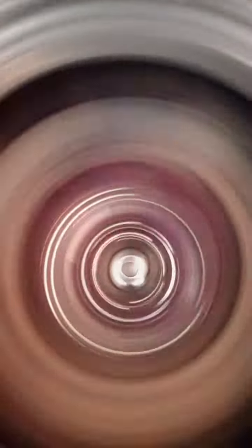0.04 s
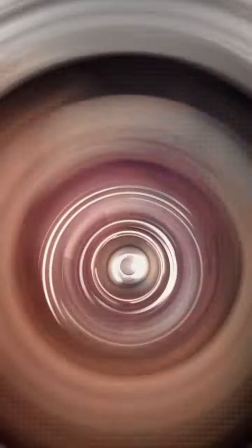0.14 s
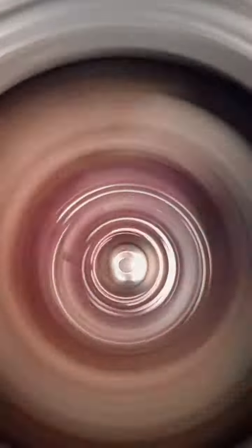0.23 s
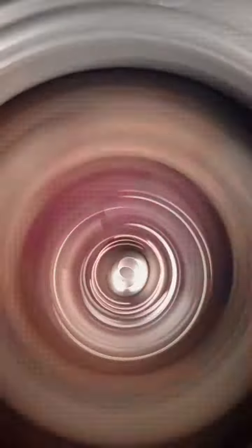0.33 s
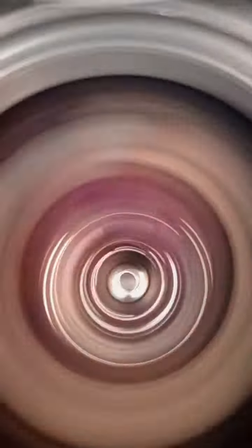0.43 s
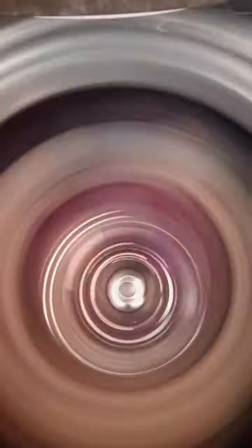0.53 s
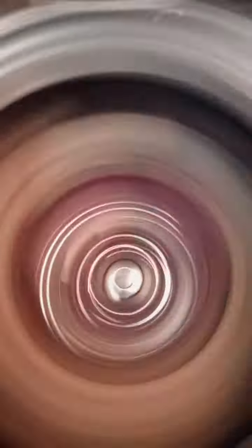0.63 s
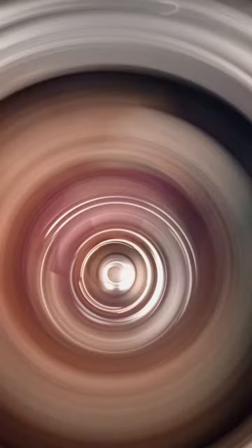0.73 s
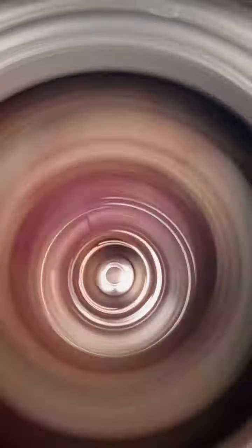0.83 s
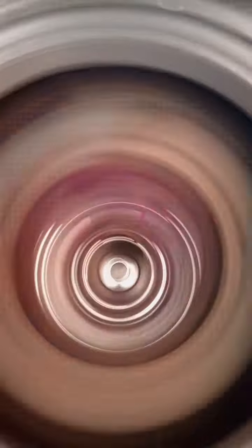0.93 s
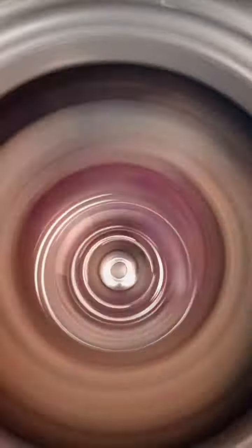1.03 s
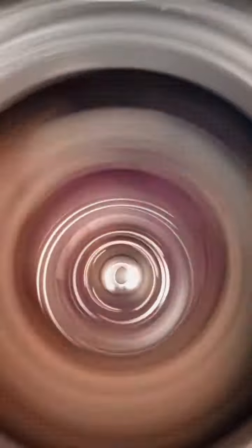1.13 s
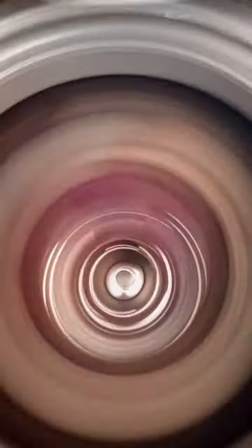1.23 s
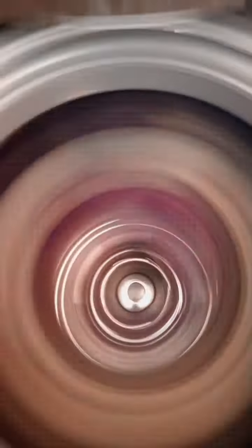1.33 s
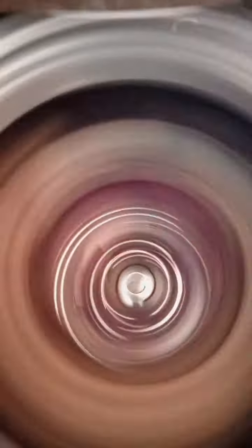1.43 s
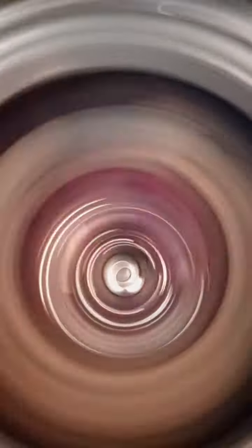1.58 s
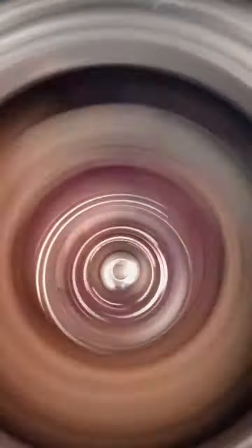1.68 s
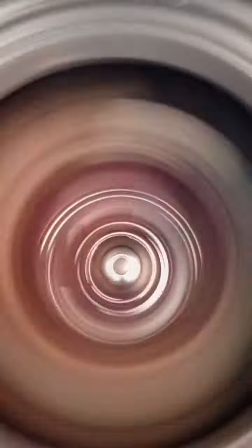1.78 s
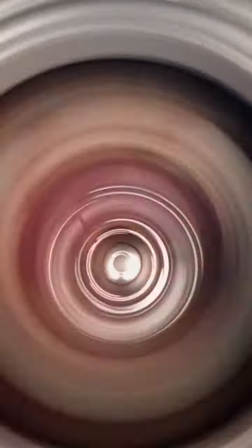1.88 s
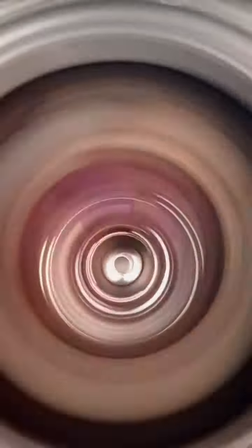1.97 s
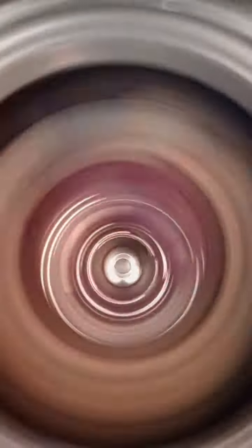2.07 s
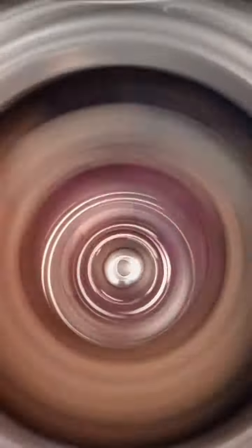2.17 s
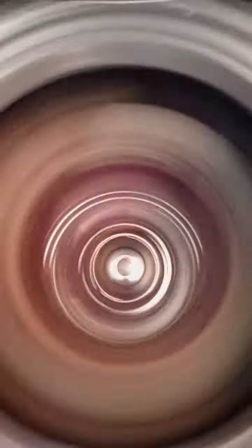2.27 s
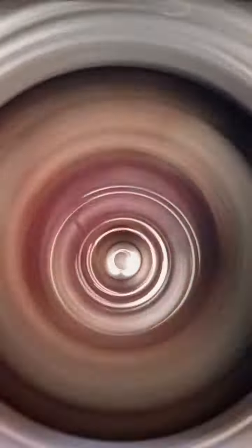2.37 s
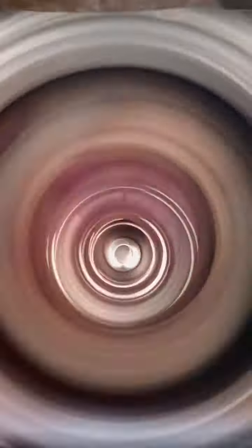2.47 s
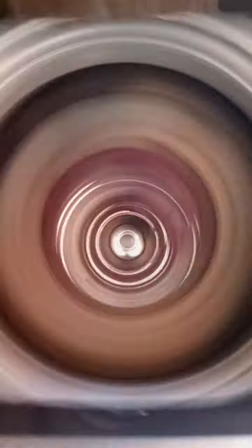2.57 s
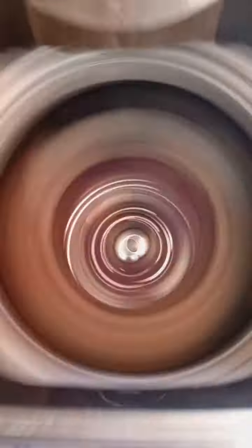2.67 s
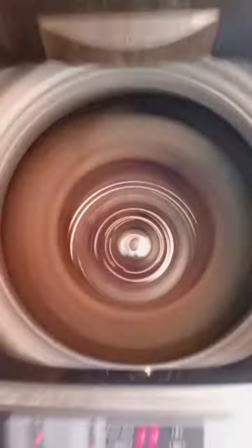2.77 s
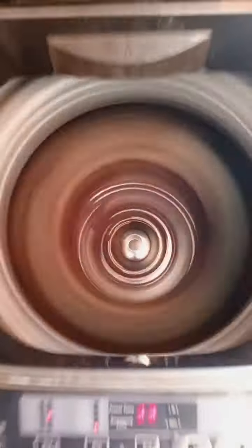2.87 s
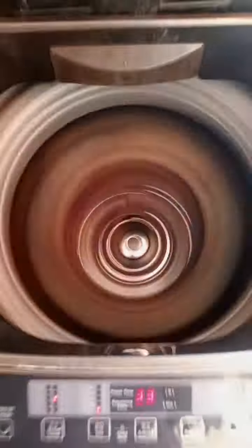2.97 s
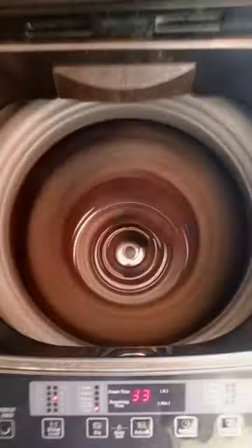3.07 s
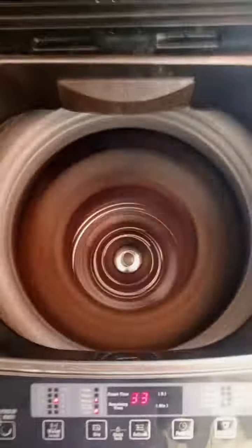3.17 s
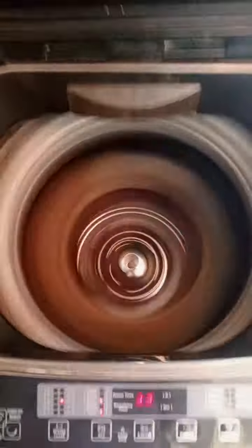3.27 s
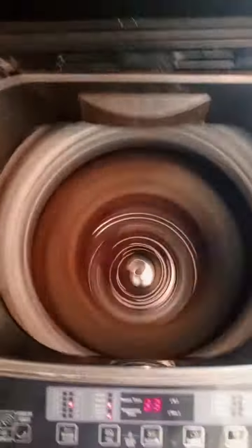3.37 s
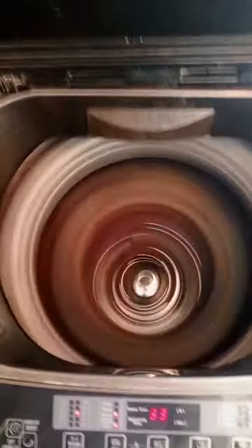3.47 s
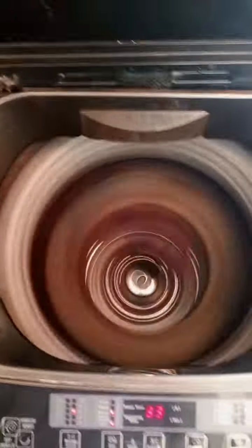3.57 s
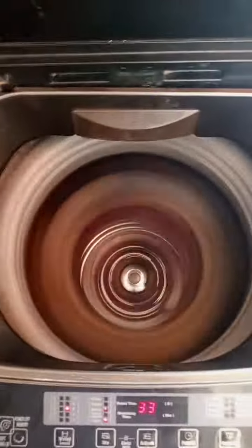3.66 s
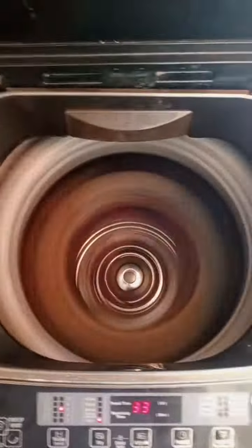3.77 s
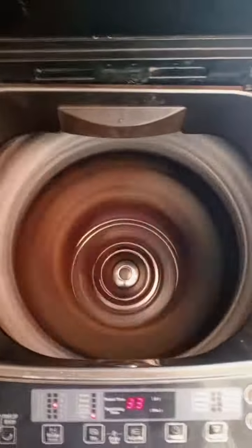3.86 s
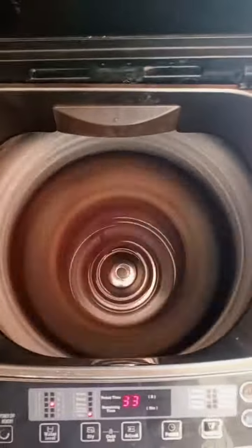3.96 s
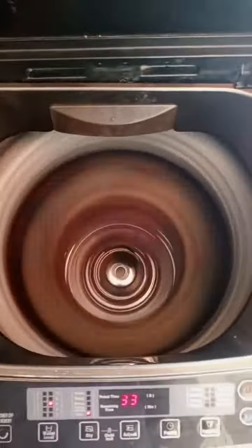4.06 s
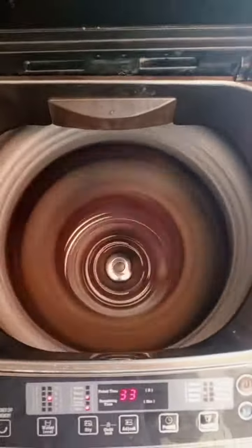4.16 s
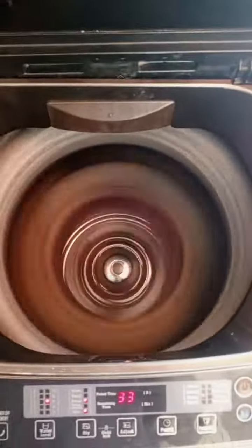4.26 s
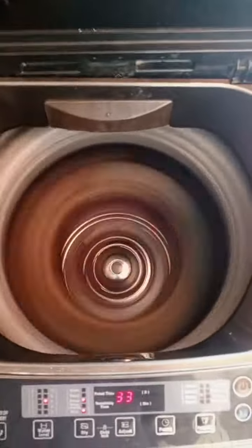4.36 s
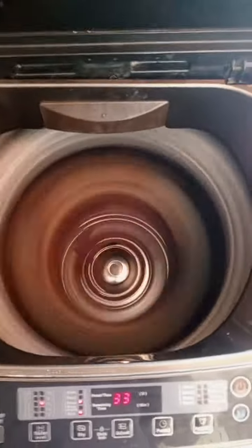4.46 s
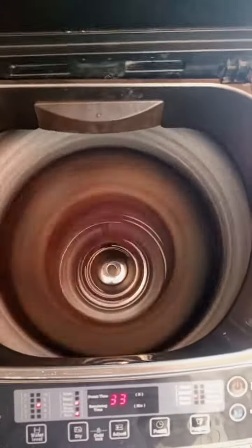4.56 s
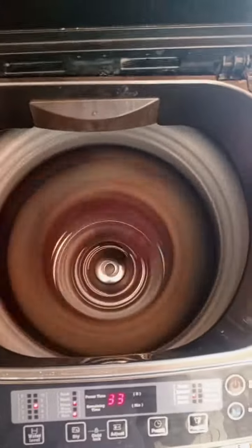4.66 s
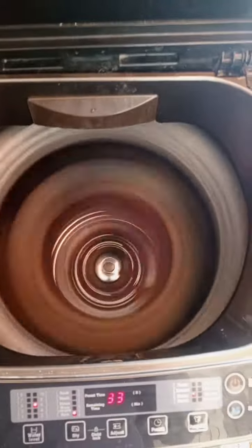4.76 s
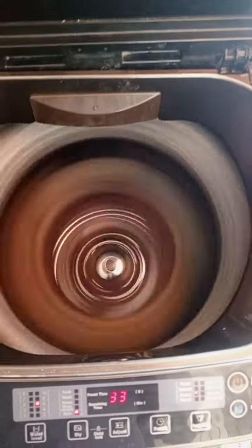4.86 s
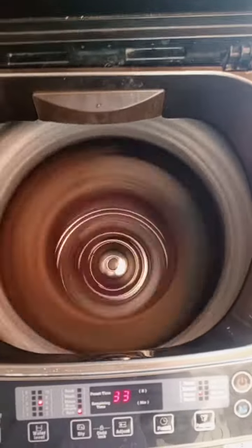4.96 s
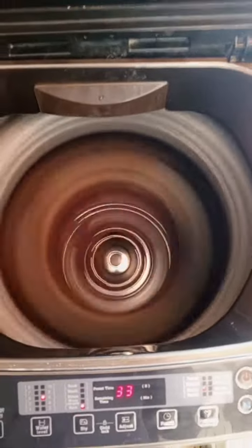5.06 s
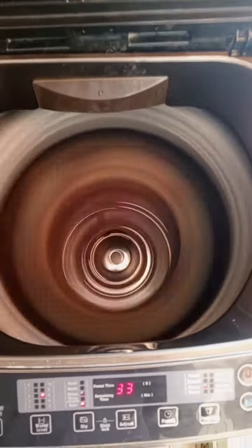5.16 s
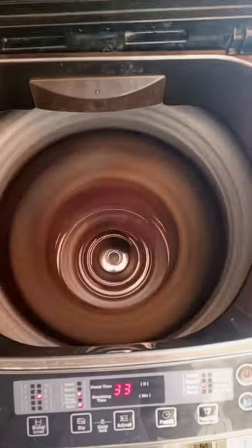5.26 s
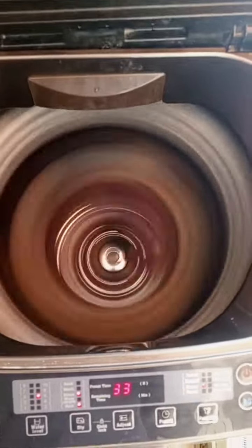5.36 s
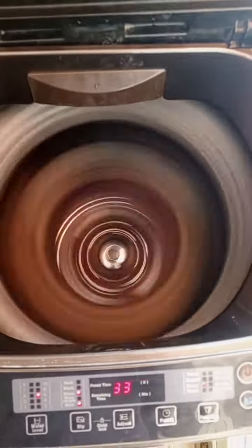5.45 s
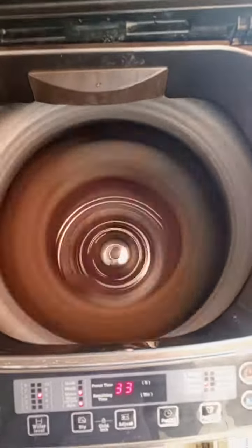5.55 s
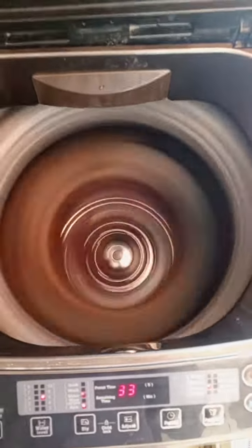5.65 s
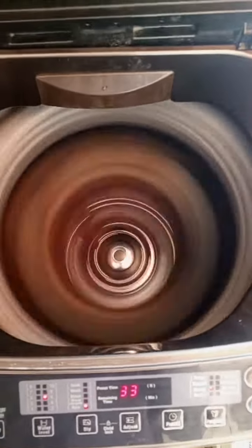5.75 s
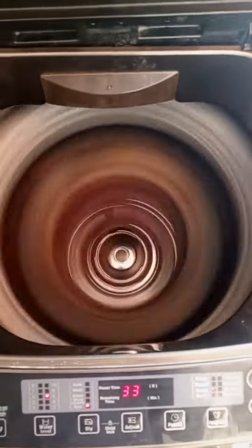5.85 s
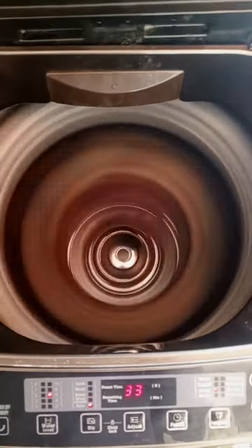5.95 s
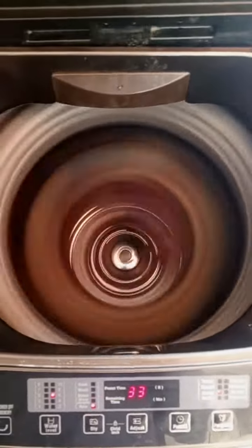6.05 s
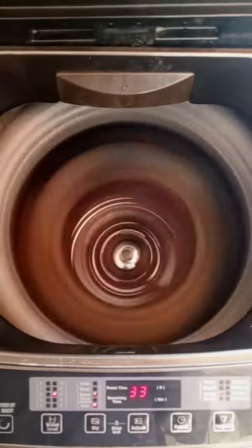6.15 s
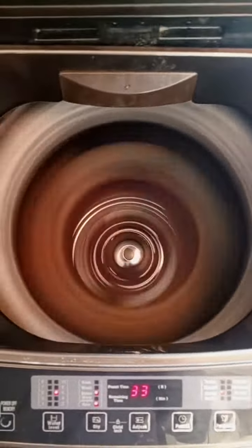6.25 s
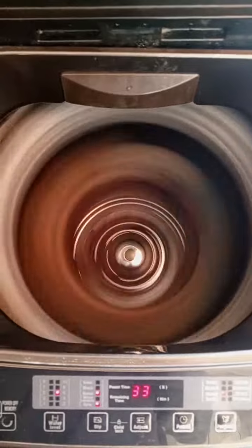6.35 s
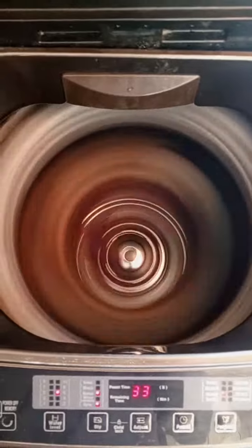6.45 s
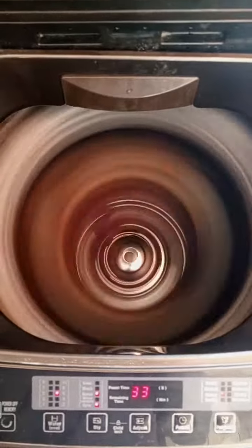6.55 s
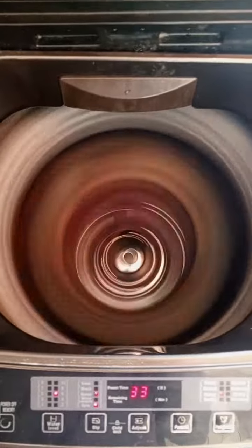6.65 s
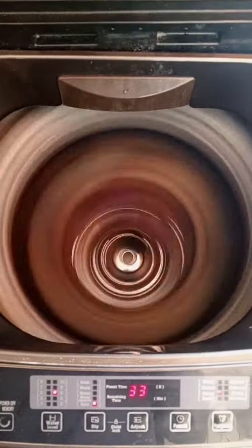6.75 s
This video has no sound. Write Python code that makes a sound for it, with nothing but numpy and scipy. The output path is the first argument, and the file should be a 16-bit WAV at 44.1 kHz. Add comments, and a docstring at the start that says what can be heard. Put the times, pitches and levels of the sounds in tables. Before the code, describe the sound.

A washing machine spins fast with a rapid, even knocking rattle over a low hum and rushing air, easing slightly later.

```python
"""Washing machine on spin, lid open.

A top-loader turns about twelve times a second. Once a turn the off-centre drum knocks the swaying
tub and the cabinet, then rubs on the way back. Flung drops tick, air hisses, drum and motor hum.
The microphone draws back from the drum; then the motor cuts out and the drum begins to coast."""
import sys
import numpy as np
from scipy import signal
from scipy.fft import rfft, irfft
from scipy.io import wavfile
from scipy.ndimage import uniform_filter1d

SR = 44100
rng = np.random.default_rng(int(sys.argv[2]) if len(sys.argv) > 2 else 0)


def to_wav(s):
    """Save 16-bit WAV."""
    ch = np.atleast_2d(s).T  # columns
    pcm = np.round(np.clip(ch, -1, 1) * 32767)  # PCM
    wavfile.write(sys.argv[1], SR, pcm.astype(np.int16))


N = 300311
TURNS_PER_S, FIRST_KNOCK_S, MOTOR_OFF_S = 11.939, .0617, 3.67
CONTACT_S, ATTACK_SAMPLES = .0002, 650
# near level/dB, far level/dB, loss at motor cut/dB, loss with slowing/(dB per turn/s)
CRACK_LAW = (-23, -27.5, 1.52, 3)
THUMP_LAW = (-20.5, -23, 2, 1)
AIR_LAW = (-31.5, -36.5, 0.2, 1.9)


def knocks(cabinet_db=-3, clatter_db=-3.5, boom_db=-0.12, echo_s=.028, size=14000):
    """The drum hits the same spot each turn, so tub and cabinet ring almost alike each time."""
    t, out = np.arange(size) / SR, np.zeros(N)
    tub, cabinet, click = tub_ring(t), cabinet_ring(t), contact_click(t)
    shared_grain = clatter_grain(size)
    for s, crack_db, thump_db in blows():
        metal = amp(cabinet_db) * heard(*cabinet, s) + amp(clatter_db) * clatter(shared_grain, s, t)
        crack = amp(crack_db) * (metal + heard(1, 0.24, s) * click)
        boom = amp(thump_db + boom_db) * heard(*tub, s)
        add(out, s, crack + boom)
        add(out, s + echo_s, amp(heard(-11, -7, s)) * boom)
    return out


def blows(spread_db=0.5):
    """Knock strength varies with sway and chance. Rows: t/s, crack/dB, thump/dB."""
    s, lean = turns().T
    chance_db = spread_db * rng.standard_normal((len(s), 2))
    crack_db = loudness(CRACK_LAW, s) + heard(0.83, 1.5, s) * lean + chance_db[:, 0]
    thump_db = loudness(THUMP_LAW, s) + 1.2 * lean + chance_db[:, 1]
    return np.column_stack([s, crack_db, thump_db])


# f/Hz, t60/s, near level/dB, far level/dB
TUB_MODES = [(60.3, 0.6, -14, -21), (100, 0.31, -2.5, -10), (145, 0.39, -33, -10.5), (192.2, .1, 9, 3.5),
             (241, 0.052, 11.5, 10.5), (275.4, 0.23, -0.5, -1), (324.8, 0.18, -4.5, -13),
             (399, 0.097, -4, -5)]
def tub_ring(t):
    """Low tub modes, near and far. Neighbours swing in opposition, so the boom swells."""
    hz, t60_s, *levels_db = np.transpose(TUB_MODES)
    opposed = np.pi * (1 + np.arange(len(hz)))
    return [ring(hz, t60_s, db, opposed, 1 / SR, t) for db in levels_db]


# f/Hz, near level/dB, far level/dB
CABINET_MODES = [(505, -2, -2), (565, -5, -9), (635, -1.5, -3.5), (712, -5.5, 1), (780, -4.5, -5),
                 (855, -7.5, -4), (1062, -5.5, -12.5), (1228, -7, -13.5), (1360, -9.8, -7),
                 (1440, -12.4, -9), (1590, -7, -10.8), (1665, -8.4, -13), (1805, -10.4, -13),
                 (1890, -14, -7.3), (1968, -9, -10), (2340, -10, -9.5), (2402, -7.5, -11),
                 (2600, -12.7, -16), (2930, -13, -13), (3240, -10, -15), (3520, -17, -12), (3880, -10, -15)]
# f/Hz, t60/s
CABINET_DECAY = [(500, 0.089), (1500, 0.092), (4000, 0.061)]
def cabinet_ring(t, rise_cycles=3.8):
    """Sheet-metal panels, near and far. They take up the blow over a few cycles, out of step."""
    hz, *levels_db = np.transpose(CABINET_MODES)
    t60_s = read(CABINET_DECAY, hz)
    phase = rng.uniform(0, 2 * np.pi, len(hz))
    return [unit(ring(hz, t60_s, db, phase, rise_cycles / hz, t), ATTACK_SAMPLES) for db in levels_db]


# f/Hz, near level/dB, far level/dB
CLATTER_SPECTRUM = [(100, -14, -6), (350, 3, 10.5), (500, 14, 8.5), (694, 11.5, 6.5), (840, 6.5, 7.5),
                    (920, 10, 3), (1220, 4, 1.5), (2000, 5.5, 4), (4020, 1.5, 0), (5520, -6, -8),
                    (6440, -2.5, -5.5), (10100, -9.5, -13.5), (12900, -21.5, -35), (16000, -44, -46)]
def clatter(shared_grain, s, t, snap_db=1, snap_s=0.018):
    """Clatter, densest just after contact. From farther back it varies more from knock to knock."""
    fresh = heard(0.23, 0.86, s)
    grain = np.sqrt(1 - fresh ** 2) * shared_grain + fresh * clatter_grain(len(t))
    near, far = (colour(grain, CLATTER_SPECTRUM, column) for column in (1, 2))
    snap = (1 + amp(snap_db) * np.exp(-t / snap_s)) * (1 - np.exp(-t / CONTACT_S))
    return unit(heard(near, far, s) * snap * (1 - t / t[-1]), ATTACK_SAMPLES)


# f/Hz, t60/s
CLATTER_DECAY = [(200, 0.64), (1000, 0.098), (4000, 0.086), (12000, 0.037)]
def clatter_grain(size):
    """A dense ring with its chance spectral peaks flattened."""
    spectrum = rfft(dying_noise(CLATTER_DECAY, size))
    power = uniform_filter1d(abs(spectrum) ** 2, size=60)
    return unit(irfft(spectrum / np.sqrt(power + 1e-12), size))


def contact_click(t, level_db=12, peak_s=.00005, top_hz=7200):
    """The contact itself: one sharp pulse."""
    pulse = -amp(level_db) * t / peak_s * np.exp(1 - t / peak_s)
    return signal.sosfilt(signal.butter(4, top_hz, fs=SR, output="sos"), pulse)


# near delay after knock/s, near level re crack/dB, far delay/s, far level/dB
RUB_STROKES = [(0.0506, -9, .047, -6.5), (.072, -18, .073, -19)]
# f/Hz, width/Hz, near lift/dB, far lift/dB
RUB_RESONANCES = [(1890, 70, -1, -2), (2680, 110, -2, -12), (2900, 140, 12, 8), (3520, 170, 1, 7),
                  (3950, 83, 6, -5), (4150, 90, 7, -7), (4420, 72, 1, 10)]
# f/Hz, level/dB
RUB_SPECTRUM = [(100, -30), (400, -31), (1200, -12), (1650, 13.5), (2200, 4.5), (2900, -1), (3250, 1),
                (3550, 6), (4300, 2), (5200, -9.5), (8500, -5.5), (14000, -41)]
def rubs(rise_s=0.0021, fade_s=0.009, spread_db=0.4, size=3000):
    """Two short scrapes as the tub swings back, both exciting the same resonances."""
    t, hz, out = np.arange(size) / SR, np.fft.rfftfreq(size, 1 / SR), np.zeros(N)
    stroke = (1 - np.exp(-t / rise_s)) * np.exp(-t / fade_s)
    for s, _ in turns():
        lift_db = sum(heard(near_db, far_db, s) / (1 + (2 * (hz - centre_hz) / width_hz) ** 2)
                      for centre_hz, width_hz, near_db, far_db in RUB_RESONANCES)
        for near_s, near_db, far_s, far_db in RUB_STROKES:
            grain = irfft(rfft(rng.standard_normal(size)) * amp(lift_db), size)
            scrape = unit(colour(grain, RUB_SPECTRUM)) * stroke / stroke.max()
            level_db = loudness(CRACK_LAW, s) + heard(near_db, far_db, s) - rng.normal(0, spread_db)
            add(out, s + heard(near_s, far_s, s), amp(level_db) * scrape)
    return out


# t/s, level/dB, treble/dB
LARGE_DROPS = [(0.558, -28, 0), (0.705, -18.5, -2), (1.0608, -26, 0), (1.5284, -27, 0), (1.56, -17, -2),
               (1.6268, -15, 0), (1.7797, -20.5, -6), (2.2, -22.5, 3), (2.214, -22, -8), (2.5484, -26, 0),
               (2.956, -27, -5), (2.97, -28, 0), (3.458, -27.5, 2), (4.0476, -24, -3), (5.2816, -31, -12),
               (5.351, -22, -10), (6.6972, -30, -1)]
# f/Hz, level/dB
DROP_SPECTRUM = [(1000, -32), (2200, 0), (2900, 0.5), (4200, -0.5), (6500, -3.5), (9000, -2.5), (11000, -6),
                 (12500, -19), (16000, -32)]
def drops(gain_db=-5, spray_db=-44, spread_db=4, decay_s=0.0025, tail_db=-14, tail_s=0.016, size=1800):
    """Water flung from the load ticks on the outer tub: a few large drops and a fine spray."""
    t, out = np.arange(size) / SR, np.zeros(N)
    shape = (np.exp(-t / decay_s) + amp(tail_db) * np.exp(-t / tail_s)) * (1 - np.exp(-t / CONTACT_S))
    spray = [(rng.uniform(0, N / SR), rng.normal(spray_db, spread_db), 0) for _ in range(130)]
    for s, db, treble_db in spray + list(LARGE_DROPS):
        tick = colour(rng.standard_normal(size), DROP_SPECTRUM)
        tick = colour(tick, [(4500, 0), (6500, treble_db)])
        add(out, s, amp(db + gain_db) * unit(tick) * shape)
    return out


# multiple of turning rate, level/dB
DRUM_HARMONICS = [(11, -11), (13, -11.5), (15, -18.5), (16, -15.5)]
def drum_hum(far_db=-7, lead_s=0.0051):
    """The lopsided drum flexes the tub; the hum swells twice a turn, once just before the knock."""
    t = np.arange(N) / SR
    angle = 2 * np.pi * (drum_turns() + lead_s * TURNS_PER_S)
    hum = sum(amp(db) * np.cos(order * angle) for order, db in DRUM_HARMONICS)
    return np.sqrt(2) * hum * amp(loudness(THUMP_LAW, t) + heard(0, far_db, t))


def motor_hum(hum_hz=99.2, drift_hz=0.21, load_swing=0.59, near_db=-26, far_db=-34.5):
    """The motor hums until switched off; its load swings once a drum turn."""
    t = np.arange(N) / SR
    hz = hum_hz + drift_hz * unit(uniform_filter1d(rng.standard_normal(N), size=20000))
    load = 1 + load_swing * np.sin(2 * np.pi * drum_turns())
    hum = np.sin(2 * np.pi * np.cumsum(hz) / SR)
    return amp(heard(near_db, far_db, t)) * driven(t) * load * hum


# f/Hz, near level/dB, far level/dB
AIR_SPECTRUM = [(20, -3, -9), (44.4, -3, 10), (88, 24, 19.5), (254, 19.5, 23.5), (487, 13.5, 13.5),
                (1020, 3, 5.5), (1610, -2, 5.5), (2920, -1.5, -3.5), (4500, -7, -1.5), (5900, -9.5, -12.5),
                (8650, -9.5, -9.5), (9700, -14, -16.5), (13300, -23, -23), (16000, -26, -30)]
def air_rush(flutter_db=2):
    """Air dragged round by the drum, fluttering with turbulence."""
    t, noise = np.arange(N) / SR, rng.standard_normal(N)
    near, far = (colour(noise, AIR_SPECTRUM, column) for column in (1, 2))
    flutter = unit(uniform_filter1d(rng.standard_normal(N), size=700))
    return heard(near, far, t) * amp(loudness(AIR_LAW, t) + flutter_db * flutter)


# t/s, f/Hz
HISS_CENTRE = [(0, 9300), (.5, 10070), (1.3, 10040), (2.2, 9770), (2.7, 8900), (3.1, 7730), (3.6, 8670),
               (4.3, 7750), (5.3, 8350), (6.8, 8100)]
def air_hiss(gain_db=-19, half_width_hz=750):
    """A broad peak in the rush of air that slides as the microphone moves."""
    t = np.arange(N) / SR
    noise = [1, 1j] @ rng.standard_normal((2, N))
    band = signal.sosfilt(signal.butter(2, half_width_hz, fs=SR, output="sos"), noise)
    carrier = np.exp(2j * np.pi * np.cumsum(curve(HISS_CENTRE, t)) / SR)
    return amp(loudness(AIR_LAW, t) + gain_db) * unit((band * carrier).real)


# f/Hz, t60/s
ROOM_DECAY = [(100, 0.27), (1000, 0.32), (10000, 0.23)]
def room(x, near_db=-17, far_db=-12, bass_db=-8, rise_s=0.0034, size=16000):
    """A small hard room, heard more from farther back."""
    tail = dying_noise(ROOM_DECAY, size) * np.clip(np.arange(size) / SR / rise_s, 0, 1)
    wet = signal.fftconvolve(x, tail / np.linalg.norm(tail))
    wet = colour(wet, [(250, bass_db), (500, 0)])[:N]
    return x + amp(heard(near_db, far_db, np.arange(N) / SR)) * wet


def turns(sways_per_turn=.308, peak_turn=1.82, early_s=.00045):
    """The tub sways on its springs; leaning in, it is hit sooner. Rows: knock t/s, lean (-1 to 1)."""
    angle = drum_turns()
    number = np.arange(-1, np.floor(angle[-1]) + 1)
    knock_s = np.interp(number, angle, np.arange(N) / SR, left=FIRST_KNOCK_S - 1 / TURNS_PER_S)
    lean = np.cos(2 * np.pi * sways_per_turn * (number - peak_turn))
    return np.column_stack([knock_s - early_s * lean, lean])


def drum_turns():
    """Drum angle in turns at every sample; one knock per whole number."""
    t = np.arange(N) / SR
    return TURNS_PER_S * (t - FIRST_KNOCK_S) - np.cumsum(slowing(t)) / SR


def slowing(s, sag_turns_per_s2=.0101, coast_turns_per_s2=.237):
    """Speed lost in turns/s: a slight sag under power, then coasting."""
    return sag_turns_per_s2 * s + coast_turns_per_s2 * np.maximum(s - MOTOR_OFF_S, 0)


def driven(s, release_s=0.021):
    """1 while the motor pulls, dying to 0 after it cuts out."""
    return np.exp(-np.maximum(s - MOTOR_OFF_S, 0) / release_s)


def loudness(law, s):
    """Level in dB from microphone distance, motor pull and drum speed."""
    near_db, far_db, release_db, slowing_db = law
    return heard(near_db, far_db, s) - release_db * (1 - driven(s)) - slowing_db * slowing(s)


# t/s, position (0 near: over the drum, 1 far: drawn back)
MIC_PATH = [(0, 0.02), (2.3, 0.07), (2.7, 0.35), (3.1, 0.74), (4.2, 1), (6.8, 0.93)]
def heard(near, far, s):
    """Near-to-far blend as the microphone draws back."""
    back = curve(MIC_PATH, s)
    return (1 - back) * near + back * far


def ring(hz, t60_s, db, phase, rise_s, t):
    """Struck modes that build up and die away."""
    t = t[:, None]
    envelope = amp(db - 60 * t / t60_s) * (1 - np.exp(-t / rise_s))
    return (envelope * np.sin(2 * np.pi * hz * t + phase)).sum(1)


def dying_noise(decay, size):
    """Countless close modes: noise with a decay time per band."""
    hz, t, bands = signal.stft(rng.standard_normal(size), SR, nperseg=256)
    fade = amp(-60 * t / read(decay, hz)[:, None])
    return signal.istft(bands * fade, SR, nperseg=256)[1][:size]


def colour(x, spectrum, column=1):
    """Filters by a spectrum in dB."""
    hz = np.fft.rfftfreq(len(x), 1 / SR)
    return irfft(rfft(x) * amp(read(spectrum, hz, column)), len(x))


def read(rows, hz, column=1):
    """Table lookup on a log-frequency axis."""
    table = np.array(rows)
    return np.interp(np.log(hz + 1), np.log(table[:, 0] + 1), table[:, column])


def curve(rows, s):
    """Table lookup in time."""
    return np.interp(s, *np.transpose(rows))


def add(mix, s, sound):
    """Mixes a sound in at time s."""
    start = round(s * SR)
    sound, part = sound[max(-start, 0):], mix[max(start, 0):]
    part[:len(sound)] += sound[:len(part)]


def amp(db):
    """Decibels to gain."""
    return 10 ** (np.asarray(db) / 20)


def unit(x, size=None):
    """Scales to rms 1, over the first size samples if given."""
    return x / np.sqrt(np.mean(x[:size] ** 2) + 1e-20)


def scene():
    """Knocks, rubs and drops in the room, over air and hum; mono."""
    return (room(knocks() + rubs() + drops()) + air_rush() + air_hiss() + drum_hum() + motor_hum())[None]


def record(dry, low_cut_hz=38, top_hz=16200):
    """Microphone bass roll-off, then the band limit."""
    low_cut = signal.butter(2, low_cut_hz, "highpass", fs=SR, output="sos")
    band_limit = signal.firwin(511, top_hz, window=("kaiser", 9), fs=SR)
    return signal.oaconvolve(signal.sosfilt(low_cut, dry), band_limit[None], "same")


dry = scene()
out = record(dry)
to_wav(out)
```